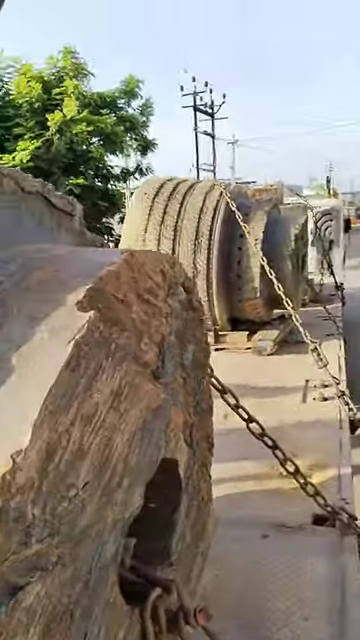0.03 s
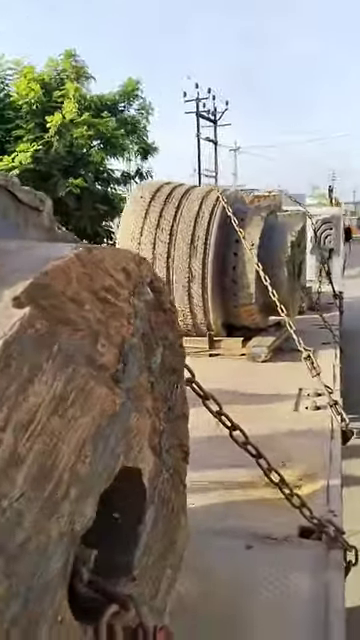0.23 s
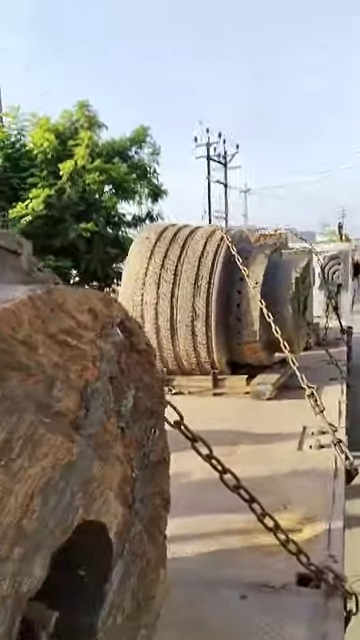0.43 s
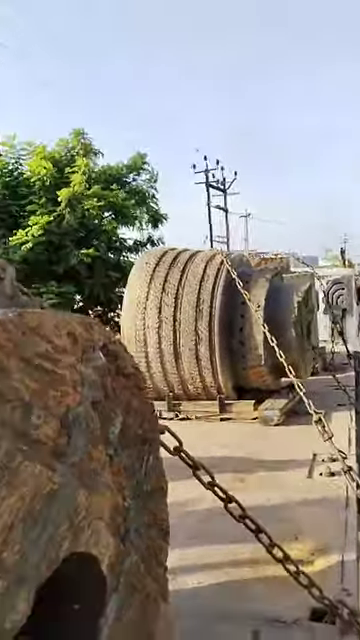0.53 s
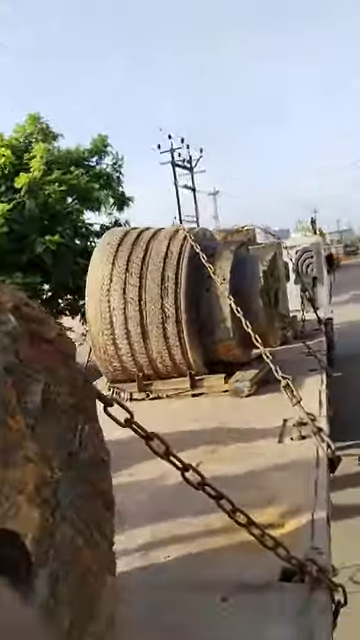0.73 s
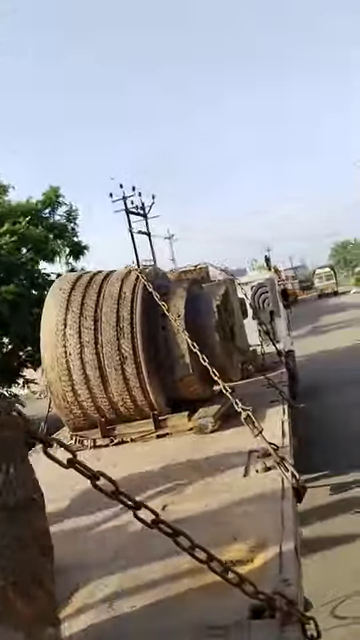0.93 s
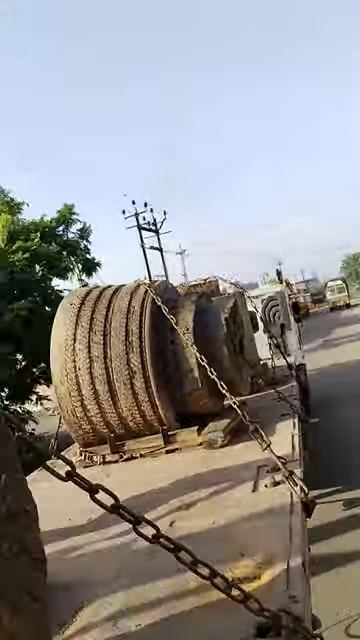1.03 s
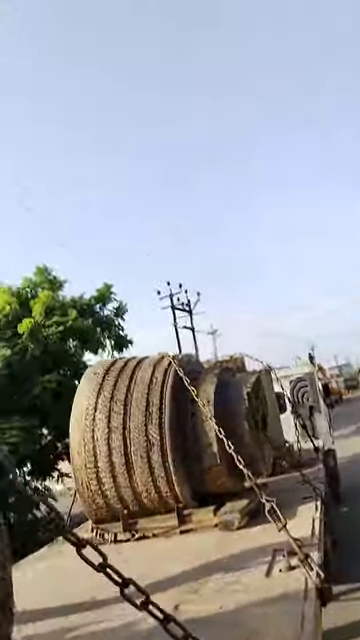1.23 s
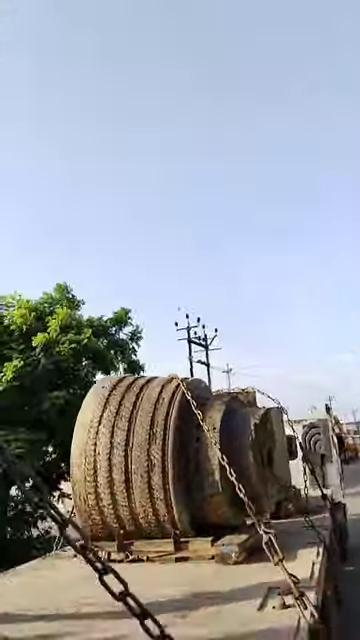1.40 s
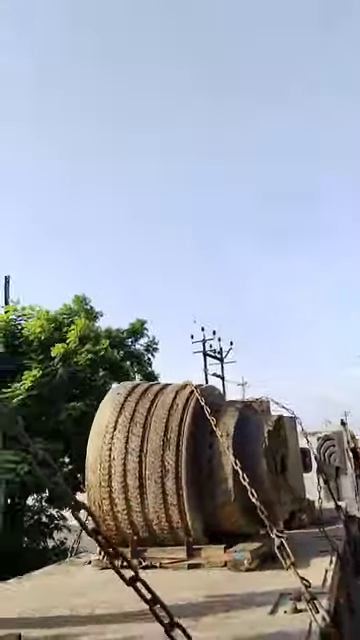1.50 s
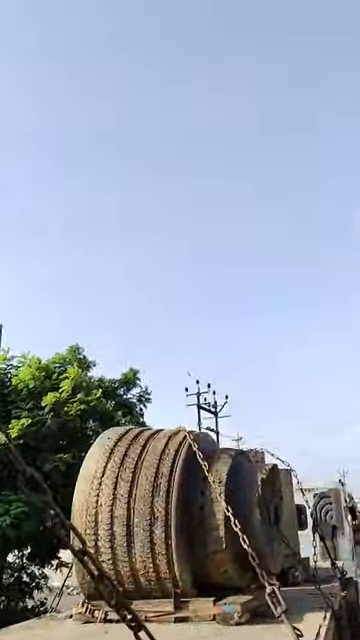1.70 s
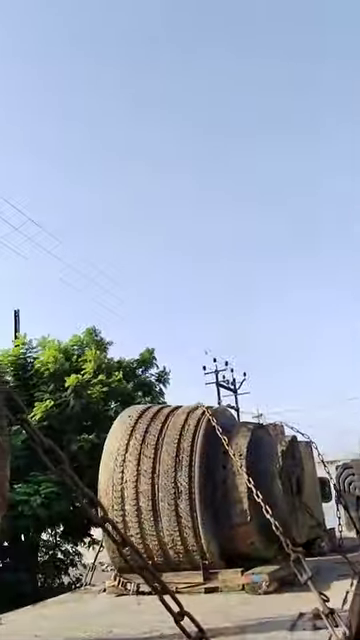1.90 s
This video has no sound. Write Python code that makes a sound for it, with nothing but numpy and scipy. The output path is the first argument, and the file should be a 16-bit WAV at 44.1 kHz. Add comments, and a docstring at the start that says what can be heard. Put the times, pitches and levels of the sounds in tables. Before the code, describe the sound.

Heavy steel scrapes on a trailer outdoors. Chains jiggle softly, then a double crash starts a loud, squealing scrape that deepens into a groan and shudder. Low machinery rumble, wind on the microphone and two dull bumps remain.

```python
"""Steel shifting on a trailer

Heavy steel shifts outdoors: loose chains jiggle, then a double crash starts a long scrape. Dense contacts
ring the steel, and friction locks onto high modes that squeal. The scrape deepens into a groan and a
grinding shudder of the deck, and ends with a last short rasp. Low machinery rumble, wind on the microphone
and two dull bumps remain."""
import sys
import numpy as np
from scipy import signal
from scipy.fft import rfft, irfft
from scipy.io import wavfile
from scipy.ndimage import uniform_filter1d

SR = 44100
rng = np.random.default_rng(int(sys.argv[2]) if len(sys.argv) > 2 else 0)


def int16_out(signal):
    """Quantize to a 16-bit WAV file."""
    q = np.round(np.clip(np.atleast_2d(signal).T, -1, 1) * 32767)
    wavfile.write(sys.argv[1], SR, q.astype(np.int16))


N = 85995
TIME_S, FREQ_HZ = np.arange(N) / SR, np.fft.rfftfreq(N, 1 / SR)


def undb(db):
    """Decibels to gain."""
    return 10 ** (np.asarray(db) / 20)


def curve(rows, column=1):
    """Gain over time from one dB column of a table."""
    rows = np.array(rows)
    return undb(np.interp(TIME_S, rows[:, 0], rows[:, column]))


def wander(rate_hz):
    """Smooth random drift, spread near 1."""
    hold = max(int(SR / rate_hz), 1)
    steps = np.repeat(rng.standard_normal(N)[:N // hold + 1], hold)
    return 1.64 * uniform_filter1d(uniform_filter1d(steps, hold), hold)[:N]


def colour(x, spectrum, tilt_db_per_octave=0):
    """Filter by a spectrum with 20 dB/octave skirts; rms 1."""
    hz, db = np.array(spectrum).T
    octave = np.log2(np.maximum(FREQ_HZ, 1))
    outside = np.maximum(np.log2(hz[0]) - octave, 0) + np.maximum(octave - np.log2(hz[-1]), 0)
    gain_db = np.interp(octave, np.log2(hz), db) + tilt_db_per_octave * octave - 20 * outside
    shaped = irfft(rfft(x) * undb(gain_db), N)
    return shaped / np.sqrt(np.mean(shaped ** 2))


def noise(spectrum):
    """Coloured noise, rms 1."""
    return colour(rng.standard_normal(N), spectrum)


def sustained(modes):
    """Steadily driven, steep-skirted resonances, held near rms 1."""
    response = 0
    for hz, width_hz, gain_db in modes:
        detune = (FREQ_HZ - hz) / width_hz
        response += undb(gain_db) / (1 + 2j * detune) / (1 + .5j * detune)
    ringing = irfft(rfft(rng.standard_normal(N)) * response, N)
    return ringing / np.sqrt(uniform_filter1d(ringing ** 2, size=1500))


def swell(centre_s, width_s):
    """Gaussian envelope, peak 1."""
    return np.exp(-.5 * ((TIME_S - centre_s) / width_s) ** 2)


# Machinery spectrum: freq_hz, gain_db
MACHINERY_SPECTRUM = [(22, -14), (45, -0.5), (80, -4.5), (210, -12), (400, -15), (650, -20.5), (1200, -20),
                      (2800, -30), (3500, -27), (7400, -46.5), (8600, -39), (10500, -57)]

def machinery(rumble_db=-44.5, whine_db=-65, whine_hz=3700, whine_width_hz=90):
    """Machinery rumbles under a thin whine; the rumble dips briefly after the crash."""
    dip_db = -9 * swell(centre_s=.44, width_s=.084)
    flicker_db = .7 * wander(25.38)
    rumble = undb(rumble_db + dip_db + flicker_db) * noise(MACHINERY_SPECTRUM)
    return rumble + undb(whine_db) * sustained([(whine_hz, whine_width_hz, 0)])


# Gusts: centre_s, width_s, level_db
GUSTS = [(.06, 0.062, -38), (0.221, 0.032, -29.5), (0.933, 0.043, -27), (1.6, 0.2, -42)]
# Wind spectrum: freq_hz, gain_db
WIND_SPECTRUM = [(25, -12), (48, 2.5), (78, 0.5), (115, -3), (250, -31)]

def wind():
    """Gusts buffet the microphone."""
    envelope = sum(undb(level_db) * swell(centre_s, width_s) for centre_s, width_s, level_db in GUSTS)
    return envelope * noise(WIND_SPECTRUM)


# Dull bumps: start_s, decay_s, level_db
DULL_BUMPS = [(1.816, .022, -35), (1.875, .1, -42)]
# Spectrum of bumps and frame rumble: freq_hz, gain_db
DULL_SPECTRUM = [(60, -12.5), (135, -5.5), (220, -9.5), (350, -13.5), (700, -26), (1500, -39)]

def bumps(attack_s=.0014):
    """Two low, quickly fading bumps."""
    envelope = 0
    for start_s, decay_s, level_db in DULL_BUMPS:
        age_s = np.maximum(TIME_S - start_s, 0)
        envelope += undb(level_db) * np.minimum(age_s / attack_s, 1) * np.exp(-age_s / decay_s)
    return envelope * noise(DULL_SPECTRUM)


# Frame rumble: time_s, level_db
FRAME_LEVELS = [(0, -43), (.33, -47.5), (.7, -43.5), (.8, -37.5), (1.15, -36), (1.35, -43.5), (1.55, -57)]

def frame_rumble():
    """The trailer frame rumbles deeply."""
    return curve(FRAME_LEVELS) * noise(DULL_SPECTRUM)


# Steel resonances: freq_hz, width_hz, gain_db
STEEL_MODES = [(316, 22, 6), (422, 26, 3), (508, 16, 2), (609, 15, 4), (688, 13, 5), (2129, 18, 3),
               (2368, 44, 4), (3885, 30, 5), (4105, 35, 3)]

def steel_contacts(contacts_per_s=4500, spread_db=1.73, judder_db=1.5, wash_t60_s=.25, wash_db=-2):
    """Dense uneven contacts ring the steel: a few strong modes over a wash of weak ones."""
    strength = undb(spread_db * np.minimum(rng.exponential(size=N), 4)) * rng.choice([-1, 1], N)
    touches = rng.random(N) < contacts_per_s / SR
    contacts = touches * strength * undb(judder_db * wander(69.93))
    tail = rng.standard_normal(N) * undb(-60 * TIME_S / wash_t60_s)
    wash = undb(wash_db) * rfft(tail / np.linalg.norm(tail))
    modes = sum(undb(db) / (1 + 2j * (FREQ_HZ - hz) / width_hz) for hz, width_hz, db in STEEL_MODES)
    return irfft(rfft(contacts) * (1 + wash + modes), N)


# Chain jiggle: time_s, level_db
CHAIN_LEVELS = [(0, -38.5), (.05, -42), (.24, -42.5), (.3, -81)]
# Chain spectrum: freq_hz, gain_db
CHAIN_SPECTRUM = [(200, -8), (500, -13), (1150, 6), (2400, -11.5), (3700, -2), (4600, -22.5), (8400, -16.5),
                  (10500, -31)]

def chains():
    """Loose links jiggle softly before the crash."""
    return curve(CHAIN_LEVELS) * colour(steel_contacts(), CHAIN_SPECTRUM)


# High modes of the sliding faces: freq_hz, width_hz, gain_db
FACE_MODES = [(4615, 25, -4), (4912, 18, 0), (5020, 45, 0), (5295, 55, 0), (5655, 22, -5), (9510, 22, -7)]
# Singing of the faces: time_s, level_db
SING_LEVELS = [(.26, -63), (.33, -41.5), (.45, -39.5), (.6, -38.5), (.9, -34), (1.03, -46.5), (1.16, -58),
               (1.27, -87)]
# Groaning modes of the load: freq_hz, width_hz, gain_db
LOAD_MODES = [(1190, 10, 0), (1367, 40, -9)]
# Groan of the load: time_s, level_db
GROAN_LEVELS = [(.65, -73), (.73, -32.5), (.92, -37), (1.14, -45), (1.3, -80)]

def rubbed_modes():
    """Rubbing keeps the steel singing in a wavering high cluster; a lower groan joins."""
    return curve(SING_LEVELS) * sustained(FACE_MODES) + curve(GROAN_LEVELS) * sustained(LOAD_MODES)


# Squeals of the sliding faces: start_s, length_s, pitch_hz, level_db, roughness
FACE_SQUEALS = [(.096, .095, 5295, -47, .15), (.1, .028, 5030, -47, .3), (.297, .085, 9510, -35, .3),
                (.3, .12, 5025, -42, .6), (.405, .065, 9095, -46, .3), (.41, .29, 9513, -40.5, .2),
                (.42, .085, 5215, -43, .4), (.48, .06, 5655, -44, .2), (.575, .04, 5035, -38, .4),
                (.57, .095, 5300, -36, .3), (.632, .075, 4920, -33, .2), (.71, .045, 5042, -39, .4),
                (.84, .085, 9195, -46, .2), (.95, .055, 4990, -43, .8), (.99, .04, 4620, -48, .5)]

def squeals(edge_s=.006, ring_s=.016, flutter_db=1.5, grit_hz=160):
    """Friction locks onto one high mode, cleanly or roughly, then lets it ring out."""
    out = 0
    for start_s, length_s, pitch_hz, level_db, roughness in FACE_SQUEALS:
        age_s = TIME_S - start_s
        attack = np.clip(age_s / edge_s + .5, 0, 1)
        release = np.exp(-np.maximum(age_s - length_s + edge_s, 0) / ring_s)
        wobble = .0007 * wander(148.8) + .0004 * wander(24.37)
        phase = 2 * np.pi * np.cumsum(pitch_hz * (1 + wobble)) / SR
        grit = wander(grit_hz) * np.sin(phase) + wander(grit_hz) * np.cos(phase)
        tone = np.sqrt(2 * (1 - roughness ** 2)) * np.sin(phase) + roughness * grit
        out += attack * release * undb(level_db + flutter_db * wander(77.05)) * tone
    return out


# Sliding contact: time_s, rasp_db, hiss_db
SLIDE_LEVELS = [(.22, -54, -84), (.29, -25, -46), (.37, -31, -35), (.46, -33.5, -42.5), (.56, -33, -38.5),
                (.58, -36.5, -32), (.66, -36, -32.5), (.72, -30, -31), (.81, -30.5, -37), (.93, -32, -37),
                (.98, -41, -43.5), (1.04, -44, -53), (1.12, -42, -64), (1.2, -58.5, -59), (1.35, -84, -81)]
# Rasp spectrum: freq_hz, gain_db
RASP_SPECTRUM = [(600, -34), (1000, 1), (1400, 6.5), (2500, 1.5), (3400, -0.5), (4700, -6.5), (6200, -11.5),
                 (9500, -62)]
# Hiss spectrum: freq_hz, gain_db
HISS_SPECTRUM = [(1500, -4), (4000, -1), (5200, 3), (6000, -5), (7000, -2.5), (8200, -12.5), (9500, -5),
                 (10700, -24)]
# Deck shudder: time_s, level_db
DECK_LEVELS = [(.24, -45.5), (.29, -20), (.47, -31.5), (.6, -36.5), (.72, -37), (.82, -29.5), (.89, -22.5),
               (.96, -22), (1.04, -30.5), (1.11, -33), (1.22, -41.5), (1.4, -63)]
# Deck spectrum: freq_hz, gain_db
DECK_SPECTRUM = [(130, -40), (195, -2), (260, -4), (320, -2), (450, -2), (650, -7.5), (900, -6.5),
                 (1400, -17), (2500, -41)]

def scrape():
    """The sliding faces rasp and hiss; the deck shudders under them."""
    rasp = curve(SLIDE_LEVELS, column=1) * colour(steel_contacts(), RASP_SPECTRUM)
    hiss = curve(SLIDE_LEVELS, column=2) * colour(steel_contacts(), HISS_SPECTRUM)
    shudder = curve(DECK_LEVELS) * colour(steel_contacts(), DECK_SPECTRUM)
    return rasp + hiss + shudder


def blow_envelope(start_s, attack_s=.0025, hold_s=.023, drop_s=.0029, tail_s=.052, tail_db=-8):
    """Quick rise, hold, quick drop into a slower tail."""
    attack = np.clip((TIME_S - start_s) / attack_s + .5, 0, 1)
    released_s = np.maximum(TIME_S - start_s - hold_s, 0)
    return attack * np.maximum(np.exp(-released_s / drop_s), undb(tail_db) * np.exp(-released_s / tail_s))


# Steel on steel: start_s, clash_db, clash_tilt_db_per_octave, boom_db, clang_db, clash_cutoff_hz
STEEL_BLOWS = [(.007, -37.5, -8.5, -76, -47, 4470), (0.075, -41.5, 3, -61, -51, 4500),
               (0.245, -21.5, -0.5, -19.5, -22.5, 11000), (0.281, -23, 0.5, -30, -63, 12100),
               (0.347, -31, 4.5, -47, -51, 12400), (.858, -47, 1, -46, -27, 6100),
               (1.055, -30, -2, -58, -42.5, 4630)]
# Clash spectrum: freq_hz, gain_db
CLASH_SPECTRUM = [(400, -21), (900, 0.5), (2500, 1.5), (4400, -8.5), (5100, -13.5), (6500, -6.5),
                  (8200, -17.5), (9400, -6.5), (10500, -67)]
# Clang spectrum: freq_hz, gain_db
CLANG_SPECTRUM = [(3000, -18), (3850, -1.5), (4550, -2), (5000, -14)]
# Hollow boom modes: freq_hz, width_hz, gain_db
HOLLOW_MODES = [(400, 80, 0), (490, 60, -3), (730, 40, 0), (922, 24, -2)]

def blows(boom_lag_s=.0027):
    """Each blow is a short crush of contacts: a clash, a bright clang and a slightly later boom."""
    crush = steel_contacts()
    boom = sustained(HOLLOW_MODES)
    clang = colour(crush, CLANG_SPECTRUM)
    out = 0
    for start_s, clash_db, tilt_db_per_octave, boom_db, clang_db, cutoff_hz in STEEL_BLOWS:
        lowpass = signal.butter(2, cutoff_hz, fs=SR, output="sos")
        clash = signal.sosfilt(lowpass, colour(crush, CLASH_SPECTRUM, tilt_db_per_octave))
        out += blow_envelope(start_s) * (undb(clash_db) * clash + undb(clang_db) * clang)
        out += blow_envelope(start_s + boom_lag_s) * undb(boom_db) * boom
    return out


def scene():
    """All sources, mono."""
    trailer = chains() + blows() + scrape() + frame_rumble() + rubbed_modes() + squeals()
    return (trailer + machinery() + wind() + bumps())[None]


def record(dry):
    """Steep treble cut."""
    cutoff_hz = 10750
    return signal.sosfilt(signal.ellip(10, .2, 80, cutoff_hz, fs=SR, output="sos"), dry)


dry = scene()
out = record(dry)
int16_out(out)
```